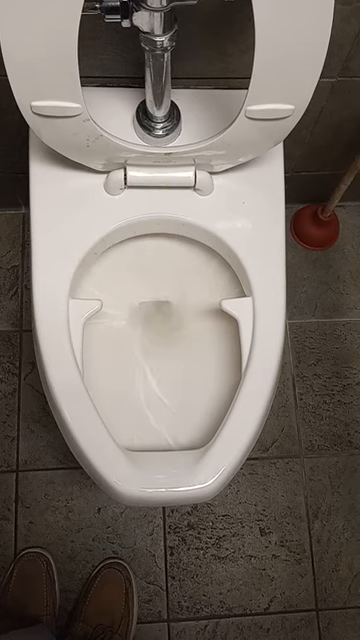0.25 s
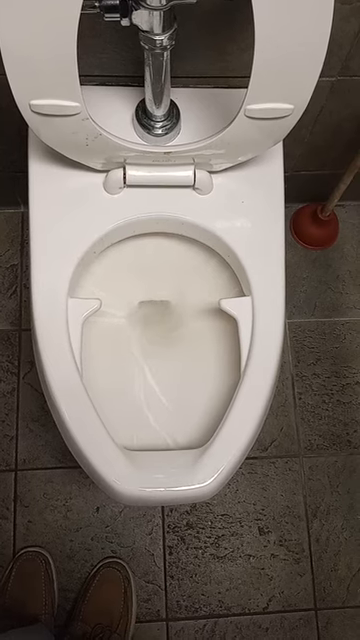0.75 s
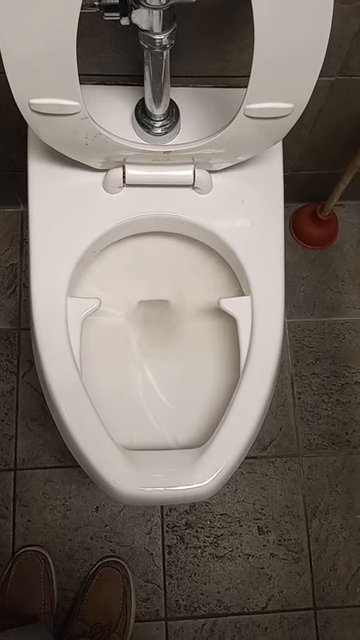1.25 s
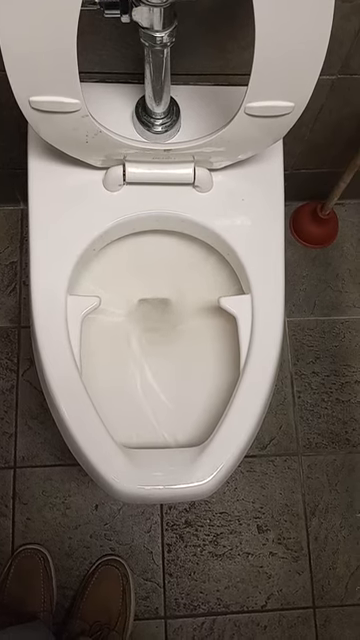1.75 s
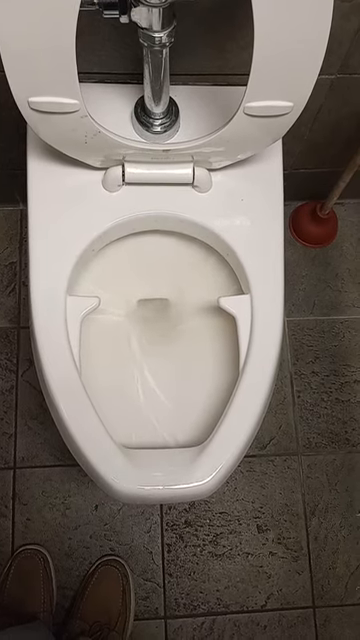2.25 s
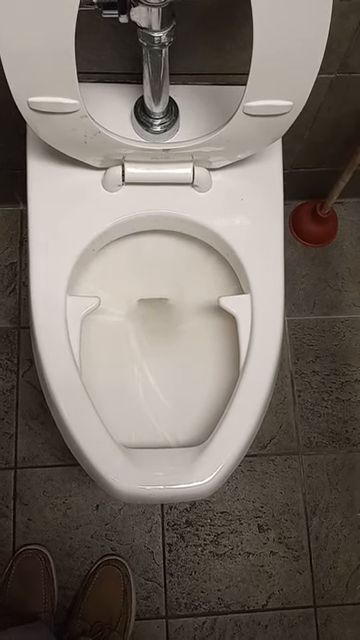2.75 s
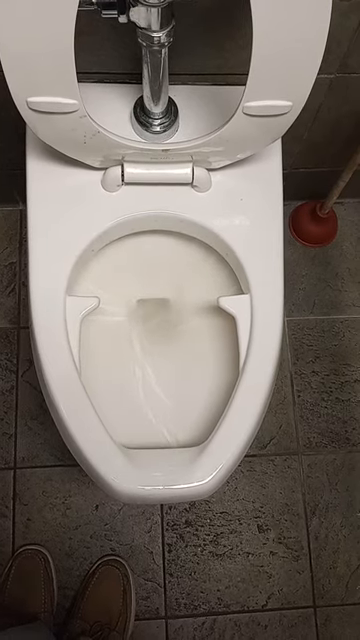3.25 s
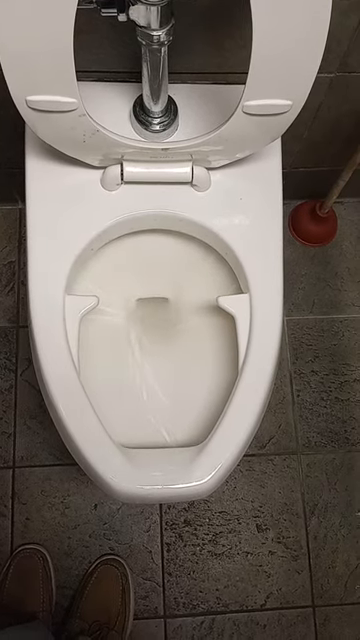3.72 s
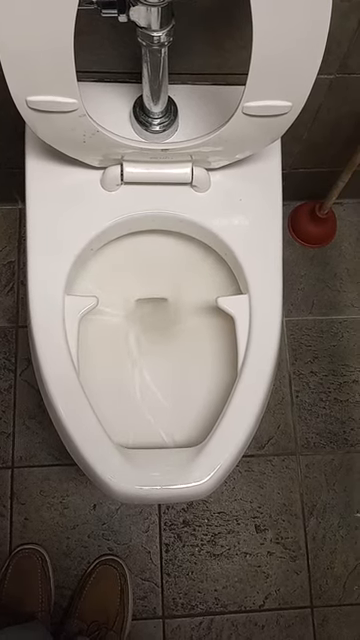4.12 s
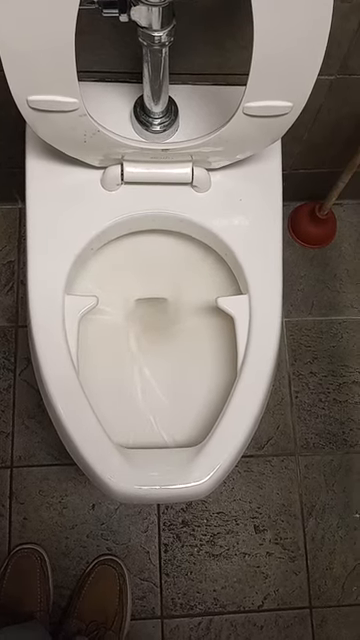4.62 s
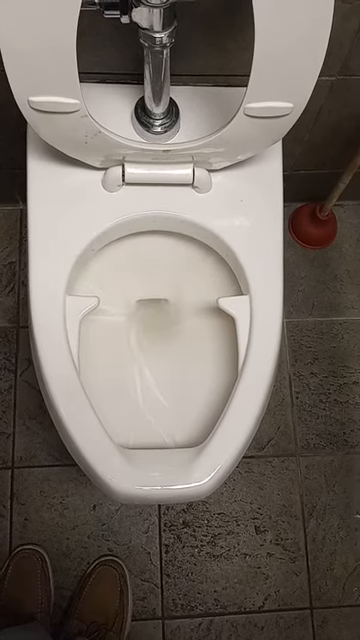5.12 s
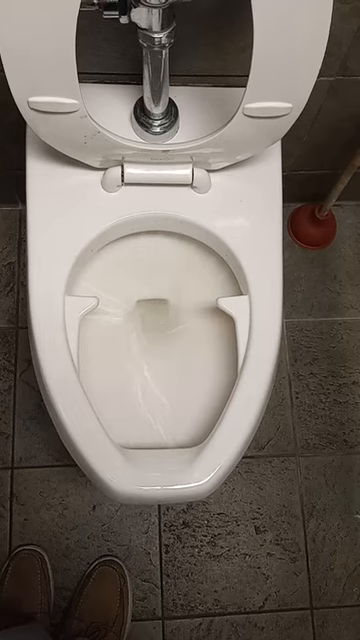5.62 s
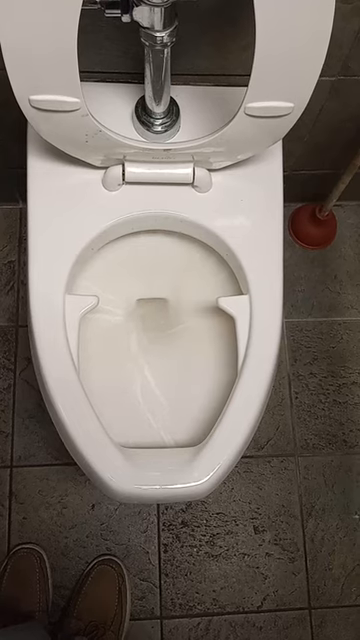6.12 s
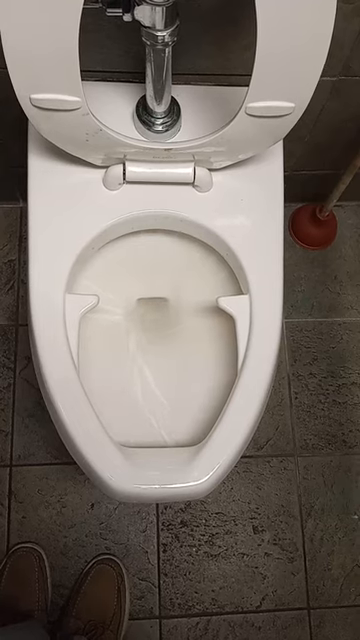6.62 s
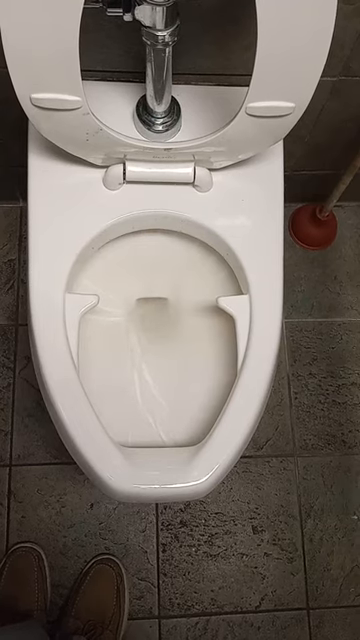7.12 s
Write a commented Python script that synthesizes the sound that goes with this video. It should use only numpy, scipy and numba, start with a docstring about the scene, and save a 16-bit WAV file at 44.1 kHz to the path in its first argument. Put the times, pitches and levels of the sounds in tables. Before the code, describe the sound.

Water pours constantly into a porcelain bowl, close in stereo with short, hard room reflections. Irregular throaty glugs, several each second, hoot low in the trap beneath a lively layer of ringing bubbles and splashes. Soft rim hiss and fizz fill the top. Plops and slaps become somewhat denser and brighter towards the end, without any final flush or shutoff.

```python
"""Running water gurgles and splashes in a porcelain toilet whose stuck flush valve never closes.
Air gulped down the trap hoots and rumbles, modelled as gliding tones and clouds of low bubbles.
The stream makes bubbles, each a dying sine; rim jets hiss as filtered noise; slaps crack and large bubbles plop.
Standing waves and scattered reflections of bowl and small tiled restroom carry it to two microphones above."""
import sys
import numpy as np
from scipy import signal
from scipy.fft import rfft, irfft, next_fast_len
from scipy.io import wavfile
from scipy.ndimage import uniform_filter1d, map_coordinates
from numba import njit

SR = 44100
rng = np.random.default_rng(int(sys.argv[2]) if len(sys.argv) > 2 else 0)


def transcribe(u):
    """Save the signal u as a 16-bit wav file named by the first command-line argument.

    u: samples, shape (n,) or (channels, n), limited to [-1, 1]; the rate is SR.
    q: integer samples, one column per channel.
    """
    v = np.clip(np.atleast_2d(u).T, -1, 1)
    q = np.round(v * 32767).astype(np.int16)
    wavfile.write(sys.argv[1], SR, q)


N = 325017
TIME = np.arange(N) / SR
SIZE = 16384   # samples in a spectrum block
FREQ = np.maximum(np.arange(SIZE // 2 + 1) * SR / SIZE, 1)   # Hz
PLACES = 5   # source positions in the bowl
LEFT_RIGHT = np.array([[1], [-1]])


def from_db(db):
    """Logarithmic level: decibels to amplitude gain."""
    return 10 ** (np.asarray(db) / 20)


def over(steady_db, power):
    """Incoherent addition: level in dB of a steady flow plus the power of its surges."""
    return 10 * np.log10(from_db(steady_db) ** 2 + power)


def rms_one(x):
    """Power normalisation: scale to unit mean square."""
    return x / np.sqrt(np.mean(x ** 2) + 1e-20)


def panned(balance_db):
    """Constant-power panning: left and right gains for a level difference in dB."""
    gains = from_db(LEFT_RIGHT / 2 * balance_db)
    return gains / np.sqrt(np.mean(gains ** 2, axis=0))


def at_pitch(points):
    """Spectral envelope: a table over frequency, interpolated on a logarithmic pitch axis at FREQ."""
    hz, value = np.transpose(points)
    return np.interp(np.log(FREQ), np.log(hz), value)


def drift(rate):
    """Slow random modulation: interpolated noise of spread 1 with `rate` new values a second."""
    return rms_one(np.interp(TIME * rate, np.arange(4096), rng.standard_normal(4096)))


def swell(age, hold_s, attack_s, release_s):
    """Energy build-up and decay: a linear rise up to age 0, a hold and an exponential release."""
    rise = np.clip(1 + age / attack_s, 0, 1)
    return rise * np.exp(-np.clip((age - hold_s) / release_s, 0, 20))


def surges(rows, attack_s, release_s, slap_s):
    """Transient power: each level column surges and decays; holds near or below slap_s rise faster."""
    power = 0
    for start_s, hold_s, *levels_db in rows:
        rise_s = attack_s * hold_s / (hold_s + slap_s)
        envelope = swell(TIME - start_s, hold_s, rise_s, release_s)
        power = power + np.outer(from_db(levels_db) ** 2, envelope ** 2)
    return power


# Standing waves of the air in trap, bowl and stall:
# pitch_hz [Hz], width_hz [Hz, of one of two equal resonances in series], level_db [dB],
# lead_rad [rad, left ahead of right, reduced at low pitch], balance_db [dB, left minus right]
AIR_MODES = [(64.2, 14.5, -16.5, 3, 2), (126.1, 21.7, -10.5, -0.5, -0.5), (148, 8.6, -18, -1, 5),
             (185.5, 72, -12, 0.45, 1.3), (268.3, 20.8, -4, 0.28, -0.5), (296, 28.5, -4.5, -0.32, 2),
             (329, 33, -8.5, 0.44, 2.5), (367.4, 19, -14.5, 1, -8), (558.3, 26.3, -10.5, 1.16, 7),
             (606, 63, -11, -2.5, -7), (791, 65, -10, 3.5, -6), (970.4, 30, -13.5, 1.4, 2.5),
             (1052.8, 47.5, -4, 2.5, 11), (1258, 40, -17, 0.5, -12), (1349, 60, -19, 0.6, 9),
             (1421, 62, -13.5, 2, -5), (1574, 49, -14, 5, 6), (1673, 80, -10.5, -0.5, -14),
             (1724, 52, -6, 1, -10), (1811, 68, -10, 2, -17), (1882, 68, -13.5, 1.5, -6),
             (2050, 66, -11, 1.3, -27), (2118, 68, -15, 0, -6), (2300, 40, -7.5, -3, 4),
             (2502, 50, -15, -1.5, -2.5), (2874, 88, -15.5, -1.46, 15), (3140, 55, -14, -1.57, -1.5),
             (3262, 69, -20.5, -3, -8), (3420, 40, -17, 3.5, 9), (3617, 45, -17, 2.5, 22),
             (3740, 91, -17.5, -1.2, 5), (4410, 120, -21, -2, 5), (4770, 136, -20.5, -1.5, -3),
             (5750, 38, -26, 0, 5), (5974, 82, -20.5, -1.4, 10)]
# Spectrum of the sound scattered by the tiles: pitch_hz [Hz], level_db [dB]
TILE_SPECTRUM = [(30, -32), (90, -51), (200, -16), (350, -12.5), (490, -22.5), (850, -22), (1170, -29),
                 (1580, -18.5), (1750, -13.5), (1950, -20), (2090, -16), (2300, -25), (3300, -22.5),
                 (4800, -25.5), (6500, -27), (8500, -36), (13000, -40)]
# Which microphone the scattered sound favours: pitch_hz [Hz], balance_db [dB, left minus right]
TILE_PANNING = [(60, -2), (92, -2), (140, -8), (210, 2), (330, -4.5), (500, 11), (770, 7), (1170, 32),
                (1790, -4.5), (2740, -0.5), (4190, 1), (6410, 1.5), (9810, 0.5), (15000, -0.5)]
EARLY_T60_S, ROOM_T60_S, LATE_DB = .12, .4, -13.0   # LATE_DB is relative to the early decay
MIC_SPACING_M, SOUND_SPEED_M_S = .09, 343
IN_STEP_BELOW_HZ = 260   # phase leads shrink below this pitch


def bowl_and_room():
    """Modal and diffuse fields: impulse responses from each place in the bowl to both microphones."""
    t = TIME[:SIZE]
    decay = from_db(-60 * t / EARLY_T60_S) + from_db(LATE_DB - 60 * t / ROOM_T60_S)
    echoes = rng.standard_normal((2, PLACES, 1, SIZE)) * decay / np.sqrt(np.sum(decay ** 2))
    mid, side = rfft(echoes) * from_db(at_pitch(TILE_SPECTRUM))
    # diffuse-field coherence: long waves reach both microphones alike
    alike = np.sinc(2 * FREQ * MIC_SPACING_M / SOUND_SPEED_M_S)
    scattered = mid * np.sqrt((1 + alike) / 2) + side * np.sqrt((1 - alike) / 2) * LEFT_RIGHT
    response = scattered * panned(at_pitch(TILE_PANNING))
    # every place drives the same modes, whose polarity alternates from one to the next
    for k, (hz, width_hz, level_db, lead_rad, balance_db) in enumerate(AIR_MODES):
        resonance = 1 / (1 + 1j * (FREQ ** 2 - hz ** 2) / (FREQ * width_hz))
        mode = (-1) ** k * from_db(level_db) * resonance ** 2
        apart = min(hz / IN_STEP_BELOW_HZ, 1) ** 2
        response += mode * np.exp(.5j * lead_rad * apart * LEFT_RIGHT) * panned(balance_db)
    return irfft(response)[..., :SIZE * 3 // 4]


def heard(source, level_db, carry):
    """Power transmission: scale a source to arrive at level_db; carry is the power passed at each pitch."""
    blocks = source.sum(axis=0)[:N - N % SIZE].reshape(-1, SIZE)
    power = np.sum(abs(rfft(blocks * np.hanning(SIZE))) ** 2, axis=0)
    return source * (from_db(level_db) / np.sqrt(np.sum(power * carry) / np.sum(power)))


def band_noise(low_hz, high_hz):
    """Turbulence: band-limited noise, independent at each place, with unit power in all."""
    sos = signal.butter(3, [low_hz, min(high_hz, .45 * SR)], "band", fs=SR, output="sos")
    return rms_one(signal.sosfilt(sos, rng.standard_normal((PLACES, N)))) / np.sqrt(PLACES)


def rim_jets(carry):
    """Turbulent jet noise: the sheet of water from the rim hisses softly, its level flickering."""
    flutter_db = 1.6 * drift(14) + 1.5 * drift(70)
    return heard(band_noise(1360, 15000), -53.5 + flutter_db, carry)


@njit
def ring_bubbles(start, place, hz, size, cycles, rise, shape, sr):
    """Bubble resonance: dying sines that climb as bubbles near the surface, 60 dB down after `cycles`."""
    out = np.zeros(shape)
    for k in range(len(start)):
        length = int(cycles[k] * sr / hz[k])
        fade, height, phase = np.exp(-np.log(1000) / length), size[k], 0.
        for i in range(min(length, shape[1] - start[k])):
            phase += 2 * np.pi * hz[k] / sr * (1 + rise * i / length)
            height *= fade
            out[place[k], start[k] + i] += height * np.sin(phase)
    return out


def bubbles(low_hz, high_hz, per_s, spread_db, swarm_db, cycles, rise, even_s):
    """Random superposition: bubbles of random pitch, size and place, their power evened over even_s."""
    swarms = rng.standard_normal((256, 16))
    when, where, pitch, strength, life, side = rng.random((int(per_s * N / SR), 6)).T
    hz = low_hz * (high_hz / low_hz) ** pitch
    # a pocket of air breaks into a short swarm of bubbles of like size
    swarm_at = [when * N / SR * 22, np.log2(hz / low_hz) * 5]
    swarm = map_coordinates(swarms, swarm_at, order=1, mode="wrap")
    size_db = spread_db * np.minimum(-np.log(1 - strength), 4) + swarm_db * swarm
    size = from_db(size_db) * hz / low_hz * np.sign(side - .5)   # random polarity
    start, place = (when * N).astype(np.int64), (where * PLACES).astype(np.int64)
    lives = max(cycles, 2) * (.5 + life)
    cloud = ring_bubbles(start, place, hz, size, lives, rise, (PLACES, N), SR)
    power = uniform_filter1d(cloud.sum(axis=0) ** 2, int(even_s * SR))
    power = uniform_filter1d(power, int(even_s * SR / 2))
    return cloud / np.sqrt(abs(power) + 0.054 * power.mean())   # the floor keeps gaps quiet


# Base level of the deepest rumble of the drain, before trap() shifts it: start_s [s], level_db [dB]
DRAIN_LEVEL = [(0.0, -54), (1.09, -92), (1.6, -48), (1.68, -74), (3.84, -51.5), (3.94, -98), (4.04, -46),
               (4.25, -76), (4.5, -57.5), (7.37, -73)]


def trap(carry, rumble_db, gulp_db, drain_share=0.57, drain_offset_db=4.5):
    """Resonance of large bubbles: air throbs in the drain, rumbles in the trap and froths at its mouth."""
    drain_db = np.interp(TIME, *np.transpose(DRAIN_LEVEL)) + drain_offset_db
    drain_db = drain_db + drain_share * (rumble_db - rumble_db.mean())
    throb = bubbles(72.6, 81.0, per_s=30, spread_db=4.0, swarm_db=9.5, cycles=6.8, rise=.1, even_s=0.22)
    rumble = bubbles(91.7, 189.0, per_s=180, spread_db=2.5, swarm_db=2.0, cycles=8.4, rise=0.14, even_s=0.12)
    froth = bubbles(222.3, 391.0, per_s=220, spread_db=3.5, swarm_db=6.5, cycles=19.0, rise=0.1, even_s=0.028)
    return heard(throb, drain_db, carry) + heard(rumble, rumble_db, carry) + heard(froth, gulp_db, carry)


# Pockets of air swallowed by the trap: start_s [s, start of the hold], hold_s [s],
# rumble_db [dB], gulp_db [dB, before the froth share or hoot gain], pitch_hz [Hz, at mid-hold]
AIR_GULPS = [(0.158, 0.02, -41.5, -37.5, 295.3), (0.296, 0.005, -41, -60, 277),
             (0.491, 0.048, -48, -27.5, 328.6), (0.525, 0.07, -66, -31.5, 262.5),
             (0.647, 0.0037, -61, -33, 290), (0.837, 0.005, -41, -57, 300), (1.394, 0.005, -46, -60, 280),
             (1.506, 0.023, -41.5, -32, 275.5), (1.674, 0.014, -43.5, -34, 290),
             (1.865, 0.011, -44, -33.5, 275.4), (2.016, 0.017, -58, -33, 279.6),
             (2.079, 0.0086, -44, -29, 316.4), (2.135, 0.1, -54, -34.5, 264.7),
             (2.339, 0.0092, -41, -26.5, 271.7), (2.733, 0.005, -41, -37.5, 299.2),
             (2.886, 0.093, -38, -50, 295.6), (2.928, 0.0045, -55, -31.5, 291.4),
             (3.126, 0.085, -58, -38.5, 284.8), (3.354, 0.1, -45.5, -35, 278.7),
             (3.436, 0.005, -55, -36.5, 285), (3.648, 0.01, -54, -33.5, 272.6),
             (3.722, 0.018, -48, -29.5, 268.5), (3.778, 0.021, -51, -40, 318),
             (3.856, 0.044, -58, -31.5, 269.6), (4.486, 0.041, -39, -31.5, 290),
             (4.644, 0.015, -40, -23.5, 273.5), (4.825, 0.04, -45, -34, 268),
             (4.969, 0.005, -53, -36, 300.3), (5.143, 0.007, -56, -34, 275),
             (5.43, 0.067, -43.5, -45, 272.7), (5.573, 0.015, -44.5, -28, 299),
             (5.757, 0.013, -38, -39, 298.4), (5.988, 0.005, -63, -35.5, 289),
             (6.142, 0.025, -41.5, -40, 306), (6.289, 0.042, -60, -29.5, 269),
             (6.569, 0.005, -59, -35, 286.7), (6.967, 0.069, -58, -33, 258.2),
             (7.261, 0.0088, -42, -35, 274)]
GULP_ATTACK_S, GULP_RELEASE_S = 0.045, 0.026
RUMBLE_DB, GULP_DB, CHURN_DB = -51, -41, 2.04   # steady levels between gulps and their random swing
GULP_FROTH_DB = -6   # share of a gulp that breaks up into loose bubbles


def trap_levels():
    """Energy surges: rumble and froth levels in dB churn unevenly and rise with each pocket of air."""
    rumble, gulp = surges([row[:4] for row in AIR_GULPS], GULP_ATTACK_S, GULP_RELEASE_S, 0)
    froth = gulp * from_db(GULP_FROTH_DB) ** 2
    return over(RUMBLE_DB + CHURN_DB * drift(17), rumble), over(GULP_DB + CHURN_DB * drift(19), froth)


GULP_RISE_PER_S, GULP_WOBBLE = 0.12, 0.028   # relative pitch climb per second, relative pitch spread


def gulps(response, level_db):
    """Frequency modulation: each air pocket hoots, wobbling and climbing in pitch as it is drawn down."""
    out, wobble = np.zeros((PLACES, N)), drift(45)
    for k, (start_s, hold_s, _, gulp_db, hz) in enumerate(AIR_GULPS):
        first = max(int((start_s - GULP_ATTACK_S) * SR), 0)
        span = slice(first, int((start_s + hold_s + 8 * GULP_RELEASE_S) * SR))
        age, place = TIME[span] - start_s, k % PLACES
        pitch = hz * (1 + GULP_RISE_PER_S * (age - hold_s / 2) + GULP_WOBBLE * wobble[span])
        envelope = swell(age, hold_s, GULP_ATTACK_S, GULP_RELEASE_S)
        hoot = np.sin(2 * np.pi * np.cumsum(pitch) / SR) * envelope
        # gain of the bowl for this hoot
        rung = signal.fftconvolve(hoot, response[place].mean(axis=0))
        passed = np.linalg.norm(rung) / np.linalg.norm(hoot)
        out[place, span] += hoot * from_db(gulp_db + level_db) / passed
    return out


# Strength of the stream where it meets the pool: start_s [s], level_db [dB]
STREAM_FLOW = [(0, 1.5), (1.1, 1), (2.3, 1.2), (3.6, -2), (4.6, 0.3), (5.8, 1), (6.9, 3.5), (7.37, 0.5)]
# The stream folds over and slaps the pool: start_s [s, start of the hold], hold_s [s],
# gurgle_db [dB], splash_db [dB], spray_db [dB], the last two before their shares
POOL_SPLASHES = [(0.051, 0.088, -48, -41.5, -49), (0.324, 0.052, -63, -37, -52),
                 (0.447, 0.0063, -38.5, -46, -42), (0.525, 0.092, -67, -40.5, -44),
                 (0.691, 0.063, -39, -43, -71), (0.816, 0.1, -62, -41, -44), (1.125, 0.15, -43, -44, -52.5),
                 (1.281, 0.015, -42, -38, -42.5), (1.676, 0.019, -42.5, -61, -54),
                 (1.808, 0.17, -46, -43, -51.5), (2.138, 0.045, -44.5, -38.5, -47.5),
                 (2.269, 0.11, -42, -41.5, -46.5), (2.568, 0.0054, -60, -60, -44),
                 (2.792, 0.17, -45, -45.5, -47), (3.012, 0.042, -41.5, -39, -45),
                 (3.15, 0.018, -36, -38, -54), (3.391, 0.015, -37.5, -44, -49),
                 (3.635, 0.048, -46.5, -40, -46), (4.005, 0.035, -47, -57, -44.5),
                 (4.221, 0.05, -42.5, -64, -70), (4.265, 0.0077, -47, -37.5, -44.5),
                 (4.37, 0.0054, -50, -39.5, -40), (4.455, 0.014, -47, -45, -45),
                 (4.573, 0.0042, -38.5, -43, -42), (5.035, 0.013, -44, -36.5, -42),
                 (5.135, 0.0043, -50, -50, -64), (5.345, 0.09, -43, -36, -56),
                 (5.513, 0.045, -41, -53, -49), (5.641, 0.024, -42, -37.5, -41),
                 (5.951, 0.0099, -35, -39, -45), (6.072, 0.021, -44, -34.5, -40),
                 (6.284, 0.044, -42, -38, -49), (6.36, 0.01, -54, -37, -47),
                 (6.488, 0.077, -51, -58, -44.5), (6.71, 0.041, -42, -34.5, -44),
                 (6.826, 0.013, -35.5, -44, -44.5), (6.925, 0.013, -40, -58, -40),
                 (7.005, 0.02, -38, -40, -55), (7.102, 0.093, -44, -38, -47), (7.328, 0.041, -39, -39, -48)]
SPLASH_ATTACK_S, SPLASH_RELEASE_S = 0.046, 0.022   # attack of a long splash
SLAP_S = 0.0072   # splashes much shorter than this hit at once
# base levels between splashes, before flow and shares, and the random swing of the stream
GURGLE_DB, SPLASH_DB, SPRAY_DB, RIPPLE_DB = -47, -47.5, -49, 2


def pool_levels():
    """Common modulation: gurgle, splash and spray in dB ride on one rippling stream and its splashes."""
    flow_db = np.interp(TIME, *np.transpose(STREAM_FLOW)) + RIPPLE_DB * drift(16)
    gurgle, splash, spray = surges(POOL_SPLASHES, SPLASH_ATTACK_S, SPLASH_RELEASE_S, SLAP_S)
    return over(GURGLE_DB + flow_db, gurgle), over(SPLASH_DB + flow_db, splash), over(SPRAY_DB + flow_db, spray)


GLUG_DB, DROPLET_DB, FIZZ_DB = -47, -50.5, -49   # mean levels
TRILL_SHARE_DB, SCATTER_SHARE_DB = -4, -3.5   # shares of a splash: like-sized and scattered bubbles
MIST_SHARE_DB, SPATTER_SHARE_DB = -0.63, -6   # shares of the spray: fine bubbles and falling drops


def bowl_water(carry, rumble_db, gurgle_db, splash_db, spray_db):
    """Bubble entrainment: the stream drives bubbles under, the smaller ones ringing higher."""
    # middling bubbles follow both the trap and the surface
    glug_db = GLUG_DB + 0.24 * (gurgle_db - gurgle_db.mean()) + 0.028 * (rumble_db - rumble_db.mean())
    # the smaller the drops, the less they follow the splashes
    droplet_db = DROPLET_DB + 0.56 * (spray_db - spray_db.mean())
    fizz_db = FIZZ_DB + 0.16 * (spray_db - spray_db.mean())
    glugs = bubbles(445.5, 898, per_s=170, spread_db=0.0, swarm_db=3.0, cycles=40.4, rise=0.16, even_s=0.18)
    gurgle = bubbles(877.5, 1396, per_s=210, spread_db=4.0, swarm_db=9.0, cycles=40, rise=0.081, even_s=0.016)
    # bubbles close to one size trill together; others scatter around them
    trill = bubbles(1652, 1794, per_s=170, spread_db=3.5, swarm_db=6.0, cycles=69, rise=0.034, even_s=0.05)
    splash = bubbles(1405, 2297, per_s=400, spread_db=2.5, swarm_db=3.5, cycles=76, rise=0.055, even_s=0.046)
    spray = bubbles(2404, 4664, per_s=1300, spread_db=4.0, swarm_db=3.0, cycles=84, rise=0.049, even_s=0.13)
    # drops that fall back tick briefly on the surface
    spatter = bubbles(2230, 5600, per_s=150, spread_db=4.5, swarm_db=3.5, cycles=17, rise=0.05, even_s=0.28)
    droplets = bubbles(4650, 7210, per_s=2000, spread_db=6.0, swarm_db=5.0, cycles=51, rise=0.034, even_s=0.14)
    fizz = bubbles(6830, 13800, per_s=2400, spread_db=4.5, swarm_db=3.5, cycles=20.7, rise=.05, even_s=0.2)
    layers = [(glugs, glug_db), (gurgle, gurgle_db),
              (trill, splash_db + TRILL_SHARE_DB), (splash, splash_db + SCATTER_SHARE_DB),
              (spray, spray_db + MIST_SHARE_DB), (spatter, spray_db + SPATTER_SHARE_DB),
              (droplets, droplet_db), (fizz, fizz_db)]
    return sum(heard(cloud, level_db, carry) for cloud, level_db in layers)


# Lumps of water that hit the glaze at once: start_s [s], level_db [dB, rms before the decay],
# low_hz [Hz], high_hz [Hz], decay_s [s, time constant]
WATER_SLAPS = [(1.284, -34, 1200, 2900, .022), (1.897, -34.5, 1400, 3000, 0.033),
               (2.159, -34, 2500, 4200, 0.016), (2.2, -39, 1200, 3000, .02), (3.142, -32, 1400, 3000, .012),
               (4.005, -36, 1300, 3500, 0.016), (4.947, -30, 3900, 5450, .011),
               (5.037, -38, 1500, 3000, 0.018), (5.346, -34, 1300, 3400, 0.027),
               (5.95, -31, 900, 2160, 0.017), (6.096, -38, 2500, 5270, 0.011),
               (6.82, -32, 1000, 3800, 0.014)]


def slaps():
    """Impact noise: each slap is a sudden band of noise that decays exponentially; a list of (s, sound)."""
    age, sounds = TIME[:SR // 5], []
    for start_s, level_db, low_hz, high_hz, decay_s in WATER_SLAPS:
        sos = signal.butter(2, [low_hz, high_hz], "band", fs=SR, output="sos")
        crack = signal.sosfilt(sos, rng.standard_normal(len(age)))
        sounds.append((start_s, from_db(level_db) * rms_one(crack) * np.exp(-age / decay_s)))
    return sounds


# Single large bubbles that ring out: start_s [s], level_db [dB, peak of the envelope],
# pitch_hz [Hz], ring_s [s, time to fall 60 dB]
LARGE_BUBBLES = [(0.443, -24.5, 1793, 0.033), (0.448, -30, 4740, 0.02), (0.652, -31, 1745, 0.017),
                 (0.692, -32, 2110, 0.044), (0.73, -34, 1265, 0.07), (0.758, -30.0, 1050, 0.078),
                 (0.812, -38, 3718, 0.035), (0.822, -32.5, 1763, 0.18), (0.977, -28, 1670, 0.022),
                 (1.012, -36.5, 557, 0.06), (1.205, -33.5, 1713, 0.081), (1.302, -27, 1654, 0.022),
                 (1.422, -31.5, 593, 0.039), (1.565, -30.0, 582, 0.046), (1.671, -32.5, 2105, 0.05),
                 (1.701, -35, 1064, 0.06), (1.86, -27.5, 1700, 0.018), (1.897, -28.5, 1410, 0.03),
                 (1.918, -28, 1732, 0.02), (1.956, -30.5, 1730, 0.06), (2.024, -38, 2833, 0.12),
                 (2.131, -35.5, 1067, 0.092), (2.159, -30, 3110, 0.11), (2.2, -33, 1270, 0.05),
                 (2.207, -29.5, 2160, 0.025), (2.326, -28.5, 1740, 0.039), (2.348, -30, 3100, 0.02),
                 (2.576, -31, 3110, 0.038), (3.001, -25, 1695, 0.019), (3.039, -34.5, 1053, 0.06),
                 (3.142, -20.5, 1705, 0.022), (3.143, -34, 2820, 0.049), (3.143, -29, 2100, 0.024),
                 (3.152, -37, 1050, 0.073), (3.174, -32, 1810, 0.052), (3.388, -35, 2060, 0.029),
                 (3.407, -37, 1062, 0.13), (3.544, -35.0, 4450, 0.02), (3.668, -31.5, 1017, 0.068),
                 (3.726, -31.5, 558, 0.063), (3.914, -26.5, 1680, 0.048), (3.928, -28, 2004, 0.03),
                 (4.009, -35, 1430, 0.026), (4.039, -36, 584, 0.039), (4.224, -37, 1041, 0.18),
                 (4.271, -29, 2830, 0.02), (4.364, -39, 2863, 0.19), (4.379, -30, 3718, 0.02),
                 (4.569, -33, 3740, 0.027), (4.571, -31, 3100, 0.02), (4.949, -27, 4700, 0.02),
                 (5.036, -27.5, 1745, 0.04), (5.041, -30, 2849, 0.02), (5.056, -33.0, 1060, 0.11),
                 (5.07, -31, 1730, 0.035), (5.132, -27.5, 1736, 0.031), (5.16, -39.5, 938, 0.11),
                 (5.354, -34.0, 2510, 0.06), (5.361, -24.5, 1706, 0.032), (5.366, -32, 1394, 0.05),
                 (5.378, -35, 3250, 0.091), (5.394, -36.5, 1041, 0.21), (5.415, -30.5, 1718, 0.091),
                 (5.519, -36.5, 1056, 0.15), (5.545, -34, 560, 0.15), (5.655, -32, 1047, 0.068),
                 (5.95, -28.5, 3770, 0.018), (5.951, -26.5, 1722, 0.045), (5.952, -31.5, 560, 0.031),
                 (5.953, -32, 1053, 0.13), (5.965, -30, 1260, 0.02), (5.97, -33, 2053, 0.06),
                 (6.081, -31, 1855, 0.068), (6.096, -30, 4920, 0.056), (6.099, -32.0, 3150, 0.055),
                 (6.113, -32, 4100, 0.024), (6.122, -35, 4740, 0.02), (6.22, -38, 561, 0.18),
                 (6.274, -29.5, 1370, 0.035), (6.313, -25, 1696, 0.037), (6.324, -39, 563, 0.088),
                 (6.41, -23, 1760, 0.021), (6.509, -33, 4795, 0.02), (6.57, -36, 3718, 0.031),
                 (6.692, -27, 1718, 0.14), (6.694, -37, 1050, 0.091), (6.757, -29, 2480, 0.02),
                 (6.761, -37, 3220, 0.032), (6.819, -31.0, 3660, 0.02), (6.821, -29, 1040, 0.16),
                 (6.821, -30, 3210, 0.038), (6.833, -27, 1780, 0.018), (6.935, -40, 3180, 0.1),
                 (6.938, -30, 559, 0.086), (6.941, -31, 4830, 0.04), (7.006, -37, 1053, 0.11),
                 (7.023, -26, 3170, 0.035), (7.087, -30, 3100, 0.02), (7.104, -25.5, 1717, 0.039),
                 (7.14, -23.5, 1680, 0.095), (7.183, -34, 1055, 0.066), (7.196, -23, 1790, 0.019),
                 (7.209, -27, 3130, 0.029)]


def plops(rise=0.048, opening_cycles=2.1, opening_share=0.11):
    """Bubble resonance: each swells, slower if long-lived, and rings down climbing; a list of (s, sound)."""
    age, sounds = TIME[:SR // 5], []
    for start_s, peak_db, hz, ring_s in LARGE_BUBBLES:
        opening_s = opening_cycles / hz + opening_share * ring_s
        envelope = (1 - np.exp(-(age / opening_s) ** 1.3)) * from_db(-60 * age / ring_s)
        # the climbing pitch passes hz at opening_s
        tone = np.sin(2 * np.pi * hz * age * (1 + rise * (age / 2 - opening_s) / ring_s))
        sounds.append((start_s, from_db(peak_db) * tone * envelope / envelope.max()))
    return sounds


BOUNCE_S = .006   # a pop comes back from bowl and tiles this much later
EAR_LAG_S = 0.00012   # a pop reaches the left microphone first
DIRECT_DB, BOWL_DB = 0.0, -3.5


def at_surface(sounds, response, direct_db, bowl_db):
    """Direct and reverberant paths: surface sounds fly straight up and also set the bowl ringing."""
    into_bowl, direct = np.zeros((PLACES, N + SR)), np.zeros(N + SR)
    for k, (start_s, sound) in enumerate(sounds):
        place, length = k % PLACES, len(sound)
        at, back = int(start_s * SR), int((start_s + BOUNCE_S) * SR)
        rung = signal.fftconvolve(sound[None], response[place, :, :length], axes=1)
        passed = np.sqrt(np.mean(np.sum(rung ** 2, axis=1)) / np.sum(sound ** 2))
        into_bowl[place, back:back + length] += sound * from_db(bowl_db) / passed
        direct[at:at + length] += sound * from_db(direct_db)
    left = direct[:N]
    right = np.interp(TIME - EAR_LAG_S, TIME, left)
    return into_bowl[:, :N], np.array([left, right])


def scene():
    """Linear superposition: all the water sounds share one bowl and one room by convolution."""
    response = bowl_and_room()
    carry = np.mean(abs(rfft(response.mean(axis=1), SIZE)) ** 2, axis=0)
    rumble_db, gulp_db = trap_levels()
    water = rim_jets(carry) + trap(carry, rumble_db, gulp_db) + gulps(response, level_db=1.0)
    water = water + bowl_water(carry, rumble_db, *pool_levels())
    rings, pops = at_surface(plops() + slaps(), response, DIRECT_DB, BOWL_DB)
    padded = next_fast_len(N + SIZE)
    spectrum = rfft((water + rings)[:, None], padded) * rfft(response, padded)
    return pops + irfft(np.sum(spectrum, axis=0), padded)[:, :N]


CUTOFF_HZ = 15700


def record(dry, port_hz=15100, port_width_hz=1200, port_db=15.5):
    """Port resonance: the microphone ports add port_db of top treble to the sound, then a steep cut."""
    padded = next_fast_len(N + SIZE)
    hz = np.arange(padded // 2 + 1) * SR / padded
    port = 1 + from_db(port_db) / (1 + ((hz - port_hz) / (port_width_hz / 2)) ** 4)
    cut = 1 / np.sqrt(1 + (hz / CUTOFF_HZ) ** 400)
    return irfft(rfft(dry, padded) * port * cut, padded)[:, :N]


dry = scene()
out = record(dry)
transcribe(out)
```